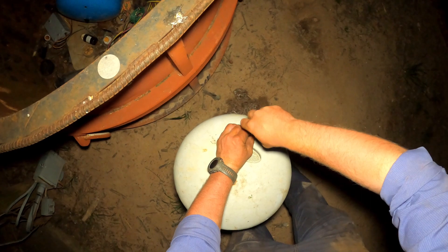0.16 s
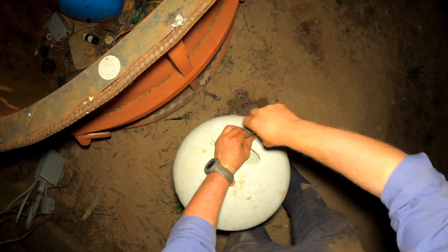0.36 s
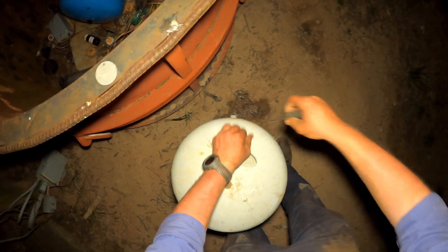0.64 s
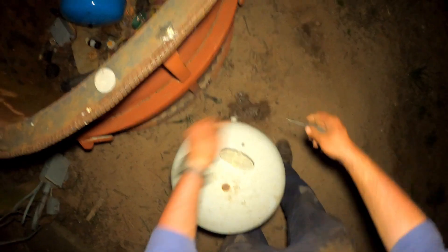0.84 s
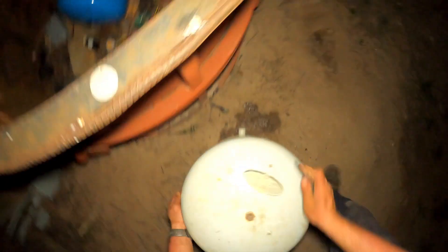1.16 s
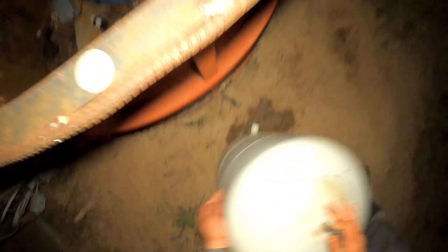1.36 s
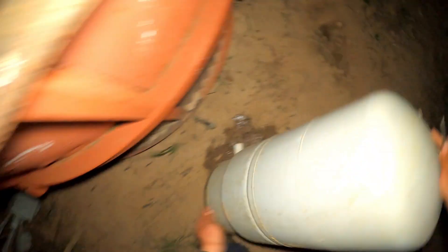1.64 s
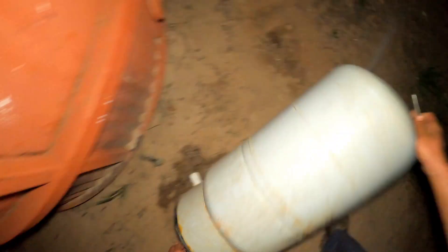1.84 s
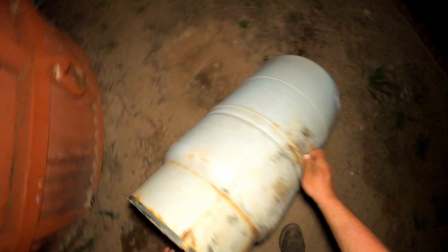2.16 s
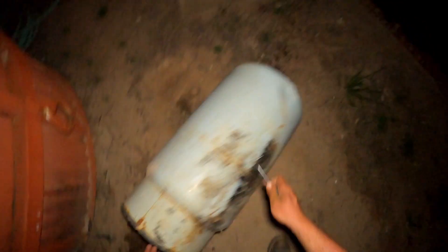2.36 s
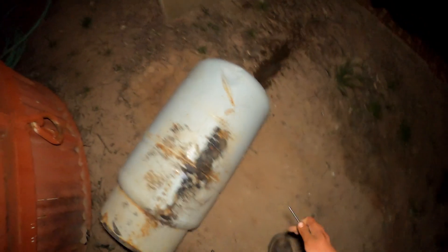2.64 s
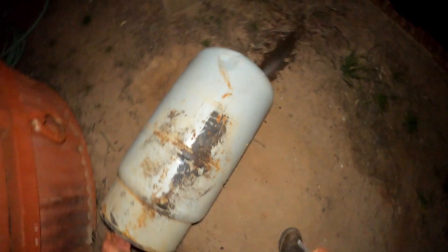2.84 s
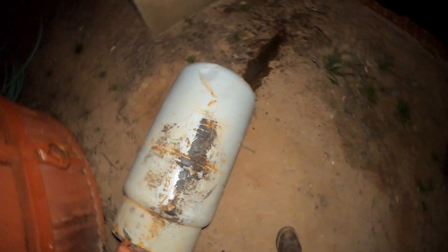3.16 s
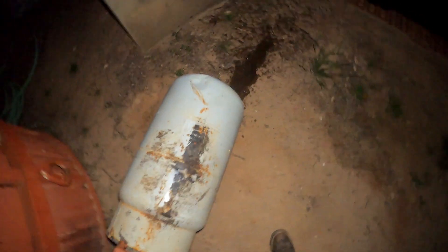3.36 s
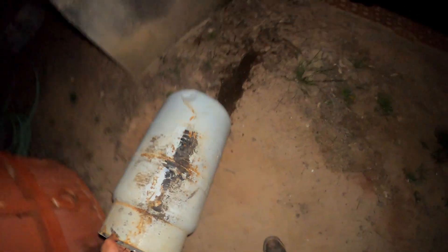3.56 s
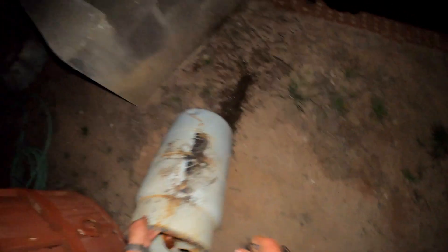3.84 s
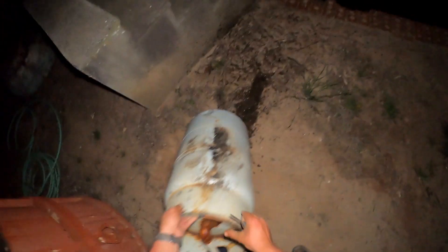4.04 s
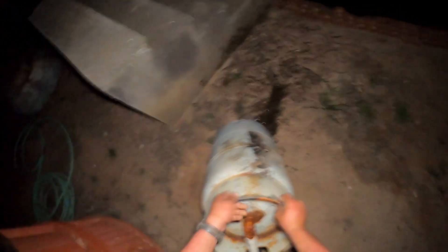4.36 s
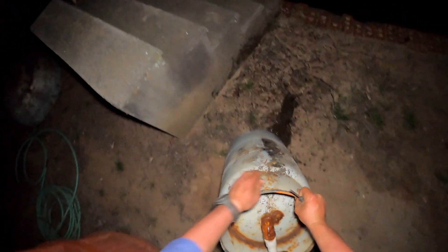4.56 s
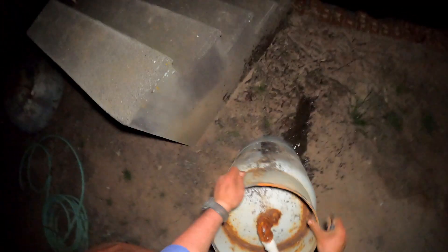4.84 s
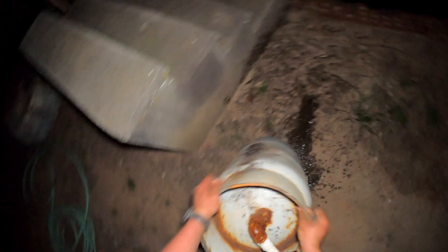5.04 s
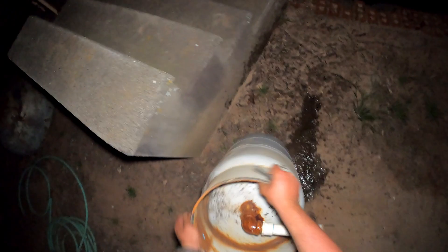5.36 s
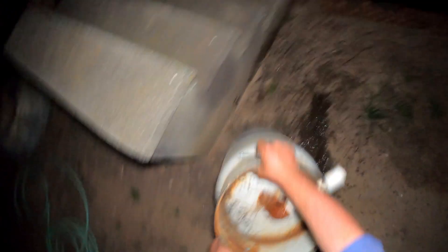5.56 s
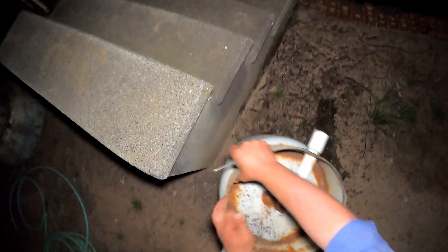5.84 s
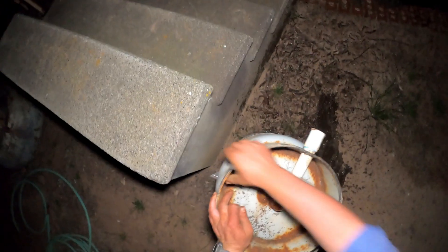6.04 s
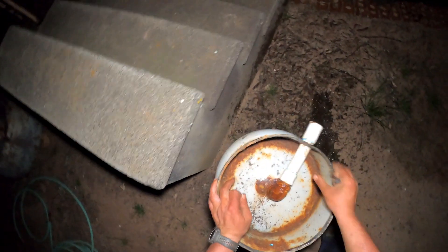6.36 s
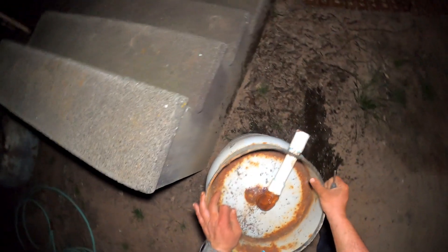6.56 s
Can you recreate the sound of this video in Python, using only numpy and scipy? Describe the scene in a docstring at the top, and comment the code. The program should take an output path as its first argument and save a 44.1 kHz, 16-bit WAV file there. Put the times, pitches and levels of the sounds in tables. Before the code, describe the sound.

Pressurised air hisses from a steel tank valve, jumps loud, then fades as the tank thuds down and sputtering water sprays onto dirt.

```python
"""Air hisses from the valve of a steel pressure tank outdoors, first past a hand, then freely.
The tank tips over with dull knocks, sprays water on dirt and is stood on its head; an engine hums far off.
Air and water are coloured noise, smooth or grainy. Gushes drive gliding resonances with grains and bubbles.
Knocks, clinks and glugs are short sines; grains ring the shell's modes; rasps and spits are resonant grains.
The hum is engine orders over low noise. Faint early reflections surround all but the hum."""
import sys
import numpy as np
from scipy import signal
from scipy.io import wavfile
from scipy.ndimage import uniform_filter1d

SR = 44100
rng = np.random.default_rng(int(sys.argv[2]) if len(sys.argv) > 2 else 0)


def int16_out(signal):
    """Quantize to a 16-bit WAV file."""
    q = np.round(np.clip(np.atleast_2d(signal).T, -1, 1) * 32767)
    wavfile.write(sys.argv[1], SR, q.astype(np.int16))


N = 295453
T = np.arange(N) / SR

# Levels in the tables are relative; each source applies its own trim.
# free air flow as the valve is worked: time_s, level_db
JET_FLOW = [(0, -35.5), (0.21, -36.5), (0.25, -29), (0.54, -29.5), (0.569, -13.5), (0.598, -20.5),
            (0.63, -16), (0.755, -19), (0.8, -16.5), (1.27, -18.5), (1.38, -26.5), (1.69, -27.5),
            (1.79, -31), (1.84, -45)]
# spectrum of the jet: freq_hz, level_db
JET_SPECTRUM = [(290, -62), (500, -5.5), (594, -30), (638, -15.5), (726, -12.5), (851, -13), (1220, -10.5),
                (1880, -2.5), (4440, 3.5), (6640, -1), (8480, -5), (9510, -4), (10500, -9), (15500, -40)]
HAND_OFF_S, HAND_SHADE_DB = 0.78, -2.5  # until it lets go, a hand shades the top octave
BLAST_S, BLAST_LENGTH_S, BLAST_DB = 2.69, 0.34, -28.5  # one more blast from the lying tank
BLAST_TOP_DB, BLAST_CLEARS_DB_PER_S = -6, 23  # its top starts dull, clears as water is blown out
ATTACK_S, RELEASE_S = 0.0073, 0.0073  # burst opening time, decay time constant
# hollow tones where the jet grazes a hand or the soil: start_s, end_s, start_hz, end_hz, width_hz, level_db
GRAZING_TONES = [(0, 0.564, 1370, 1502, 400, -38.5), (0, 0.097, 5360, 5100, 600, -38),
                 (0.1, 0.183, 5330, 5400, 260, -33.5), (0, 0.198, 4430, 4260, 700, -37),
                 (0, 0.221, 2500, 3150, 1300, -41), (0, 0.22, 7100, 7200, 300, -52),
                 (0, 0.195, 9830, 9700, 700, -44.5), (0.218, 0.31, 5390, 5220, 400, -32),
                 (0.222, 0.55, 4790, 3640, 620, -31.5), (0.28, 0.323, 9940, 9700, 900, -32.5),
                 (0.324, 0.452, 6600, 6030, 990, -30), (0.552, 0.594, 4910, 4380, 3500, -20),
                 (0.576, 0.755, 1800, 1243, 770, -23), (0.596, 0.682, 3140, 2384, 900, -22),
                 (0.669, 0.743, 2774, 2100, 900, -16.5), (.7, 0.768, 850, 468, 600, -33),
                 (2.688, 2.83, 2565, 2410, 1310, -28.5), (2.858, 3.02, 2557, 2656, 1300, -29.5),
                 (3.012, 3.06, 2500, 2827, 900, -25), (2.86, 3.059, 6030, 6500, 2200, -31.5),
                 (3.477, 3.822, 3990, 4220, 1300, -36), (4.052, 4.174, 1735, 1880, 330, -39),
                 (4.168, 4.278, 1876, 1940, 240, -37.5), (4.352, 4.45, 1860, 1770, 260, -40),
                 (4.43, 4.49, 1394, 1010, 300, -46), (4.532, 4.794, 4440, 4440, 650, -48),
                 (5.43, 5.55, 2396, 2810, 1010, -23), (5.565, 5.617, 3400, 3560, 350, -28),
                 (5.884, 6.001, 3120, 2815, 800, -24), (6.148, 6.287, 4650, 4550, 700, -29.5)]
GRAZE_FADE_SHARE = 0.17  # fade in and out, as a share of the tone's length
# water spraying on dirt: time_s, spray_db, splash_relative_db, mist_relative_db
SPRAY_FLOW = [(1.78, -30, -7, -10), (2.05, -34.5, -1.5, -5), (2.3, -40, -3, -3.5), (2.6, -34.5, -5, -3),
              (3.1, -35, -8, -0.5), (3.55, -34.5, -7.5, -2), (3.75, -35, -4, 0.5), (3.9, -36.5, -6.5, 0),
              (4.2, -33.5, -2.5, -3), (4.45, -37.5, 3.5, -4.5), (4.65, -35.5, -0.5, 0.5),
              (4.9, -38.5, 4.5, 0), (5.15, -32.5, -7, 1), (5.75, -33.5, -2.5, 0), (6.7, -36.5, 1.5, -0.5)]
# spectrum of the spray: freq_hz, level_db
SPRAY_SPECTRUM = [(290, -0.5), (500, 5), (553, -3), (803, 1.5), (982, 0.5), (1130, 0.5), (1560, -0.5),
                  (1960, -1.5), (2130, -2), (4570, -3), (5280, -10), (8240, -17), (10400, -17.5),
                  (11300, -25), (15500, -68)]
# scuffs and short rough surges of wet noise: start_s, length_s, level_db
ROUGH_SURGES = [(1.8, 0.018, -32), (1.925, 0.033, -34), (1.991, 0.039, -32), (2.153, 0.099, -32.5),
                (2.438, .022, -44), (2.52, 0.051, -36.5), (2.761, 0.072, -30), (3.009, 0.038, -31.5),
                (3.394, .045, -39), (4.907, 0.047, -36), (5.248, 0.063, -32), (6.036, 0.083, -22.5),
                (6.465, 0.12, -36.5)]
# gushes against the ground: start_s, length_s, crest_time_s, deep_roar_db, bright_rush_db
GROUND_GUSHES = [(3.314, 0.072, 3.338, -32.5, -22.5), (5.393, 0.26, 5.52, -22, -16.5),
                 (5.884, .365, 6.125, -19.5, -21)]
# resonances of the hollow between valve and mud, one list per gush: start_hz, end_hz, width_hz, level_db
GUSH_HOLLOWS = [
    [(750, 850, 750, 0), (2500, 2500, 770, -2), (3400, 3200, 1000, -1), (4200, 4250, 920, 0),
     (6600, 6600, 1100, -11)],
    [(333, 332, 290, 1.5), (474, 480, 240, 4), (600, 700, 190, 4.5), (950, 1080, 410, 2),
     (2200, 2300, 480, 4), (2456, 2650, 800, 0.5), (2500, 3600, 650, 1.5), (4240, 4400, 2500, -2.5),
     (9700, 12000, 2300, -24)],
    [(380, 380, 190, -11), (667, 667, 210, -2.5), (1050, 970, 390, 3), (1300, 1180, 310, -7.5),
     (2336, 2330, 1100, 2), (2950, 3100, 1400, -2), (3910, 4200, 830, 2.5), (4650, 4650, 740, 3.5),
     (6180, 6000, 2200, -3), (9700, 9800, 2600, -13.5)],
]
ROAR_ARCH_DB, RUSH_ARCH_DB = 7.5, 6.5  # crest of a gush over its ends
GUSH_RELEASE_S = 0.027  # slower than a dry burst
# grit crunches and water spits: start_s, level_db, centre_hz, width_hz
GRIT_SPITS = [(1.821, -23.5, 3380, 1800), (1.862, -23, 1600, 1500), (1.869, -19, 2600, 1500),
              (1.891, -25.5, 3930, 1400), (1.939, -25.5, 2000, 2000), (2.016, -32, 1500, 2000),
              (2.126, -30, 2400, 400), (2.16, -27, 1150, 1000), (2.254, -31, 2400, 500),
              (2.341, -32, 3000, 4500), (2.408, -28, 2860, 3180), (2.469, -25, 2960, 3480),
              (2.472, -29, 1170, 800), (2.531, -31, 2400, 3500), (2.617, -25, 2700, 1600),
              (3.256, -27, 3100, 1100), (3.322, -27, 3400, 2600), (3.378, -27, 3300, 3000),
              (4.925, -29, 1300, 1600), (5.275, -28, 1000, 700), (5.397, -20.5, 3560, 2600),
              (5.684, -20.5, 955, 500), (5.897, -20, 1110, 900), (6.003, -20, 980, 600),
              (6.061, -19, 1200, 1200), (6.587, -29, 3200, 1800)]
SPIT_DECAY_S = 0.0093
# tank bumps on the ground: time_s, level_db, contact_cutoff_hz, ring_length_share
GROUND_KNOCKS = [(1.837, -18.5, 700, 0.59), (1.845, -10, 270, 0.42), (1.862, -17, 2800, 0.75),
                 (1.868, -17, 2980, 0.83), (1.874, -15.5, 1400, 0.9), (1.885, -22, 1500, 0.9),
                 (1.892, -22, 1500, 0.59), (2.018, -25.5, 2500, 0.72), (2.346, -21, 700, .5),
                 (2.354, -13.5, 330, 0.66), (2.362, -16, 420, .45), (2.44, -24, 200, .8),
                 (2.474, -15, 520, 0.48), (2.478, -13, 260, 0.41)]
# free modes of the water-laden shell: mode_hz, level_db, t60_s
SHELL_MODES = [(114, -3.5, 0.053), (194, 0, 0.092), (256, -3.5, 0.11), (309, -6.5, 0.18), (388, -6, 0.12),
               (626, -1, 0.077), (760, -1, 0.15), (879, -2.5, 0.11), (1058, -6.5, 0.13), (1413, -7, 0.076),
               (2000, -3, 0.049), (2450, -2, 0.066), (2920, -7, .06)]
# short metallic clinks, perhaps tool or drops on steel: time_s, level_db, pitch_hz, upper_partial_relative_db
LIGHT_CLINKS = [(2.471, -21, 3900, -21), (2.562, -25, 3740, -11), (2.641, -20.5, 2920, -11),
                (3.148, -22.5, 2690, -15), (3.19, -25, 2950, -15), (3.259, -18, 2990, -15),
                (6.484, -25, 2880, -1), (6.55, -24, 2830, -6), (6.585, -22, 3100, -10)]
CLINK_T60_S, CLINK_UPPER_RATIO, CLINK_BOUNCE_S = 0.03, 1.4, 0.0033  # ring, upper/lower pitch, rebound delay
# water slopping inside the tank: start_s, length_s, start_hz, end_hz, level_db
WATER_GLUGS = [(2.369, 0.041, 275, 250, -33), (2.429, 0.019, 305, 385, -26), (2.449, 0.023, 365, 295, -27),
               (2.481, 0.022, 330, 400, -23)]
# hands and tool on the rim of the standing tank: start_s, length_s, centre_hz, width_hz, level_db
RIM_RASPS = [(6.456, .024, 1520, 1000, -28), (6.472, 0.018, 4360, 1300, -30.5),
             (6.5, 0.026, 1000, 1400, -31), (6.514, .028, 1210, 1000, -25), (6.519, 0.029, 3700, 2200, -33),
             (6.546, .06, 4650, 700, -33.5), (6.555, 0.043, 1300, 1300, -32.5)]
# jet reflected off the ground beside the tank: time_s, delay_ms, level_db
GROUND_REFLECTION = [(1.6, 1.2, -38), (1.85, 1.6, -12), (2.25, 2, -12), (2.7, 1.9, -17), (3.05, 1.96, -13),
                     (3.35, 2.2, -13), (3.8, 1.9, -19), (4.5, 1.47, -19), (5.55, 1.47, -21.5),
                     (5.9, 1.18, -21)]
# early reflections from ground, tank and steps: delay_s, level_db
EARLY_ECHOES = [(.0031, -31), (.0074, -24.5), (0.0116, -24), (0.0182, -18.5)]
# low background, which sinks under the loud hiss: time_s, engine_db, rumble_db
HUM_LEVELS = [(0, -38, -34.5), (0.5, -41.5, -36.5), (0.85, -58, -41.5), (1.5, -65, -45.5), (2.3, -52, -40),
              (2.8, -48, -36.5), (3.8, -40, -36), (5.2, -35.5, -34.5), (6.7, -41, -38.5)]
ENGINE_HZ = 28.34
# harmonics of the engine rate: order, level_db
ENGINE_HARMONICS = [(2, -23), (3, -10.5), (4, -6)]
# spectrum of the rumble: freq_hz, level_db
RUMBLE_SPECTRUM = [(22, -25), (36, -13), (68, -21), (90, 0), (135, -4), (180, 1), (230, -5), (290, -9),
                   (360, -10), (460, -7), (540, -12), (750, -23.5)]
DRONE_HZ, DRONE_WIDTH_HZ, DRONE_DB, DRONE_END_S = 181, 46, -35.5, 0.54  # low drone while the valve is held
CUTOFF_HZ = 15700


def from_db(db):
    """Amplitude ratio of a level in dB."""
    return 10 ** (np.asarray(db) / 20)


def rms_one(x):
    """Scale to RMS 1."""
    return x / np.sqrt(np.mean(x ** 2) + 1e-20)


def in_time(rows):
    """Each column of a curve, interpolated at every sample."""
    time_s, *columns = np.transpose(rows)
    return [np.interp(T, time_s, column) for column in columns]


def gate(start_s, end_s, edge_s=0.004):
    """1 between two times, with linear edges centred on them."""
    opening = np.clip((T - start_s) / edge_s + .5, 0, 1)
    closing = np.clip((end_s - T) / edge_s + .5, 0, 1)
    return opening * closing


def burst(start_s, length_s, release_s=RELEASE_S):
    """Linear attack, hold, exponential release."""
    attack = np.clip((T - start_s) / ATTACK_S, 0, 1)
    return attack * np.exp(-np.maximum(T - start_s - length_s, 0) / release_s)


def drift(rate_hz):
    """Low-passed noise of RMS 1, computed at every 40th sample."""
    r = np.exp(-80 * np.pi * rate_hz / SR)
    noise = rng.standard_normal(N // 40 + 2002)
    slow = signal.lfilter([1], [1, -2 * r, r * r], noise)[2000:]  # drop the settling
    return np.interp(np.arange(N) / 40, np.arange(len(slow)), rms_one(slow))


def low_pass(x, order, cutoff_hz):
    """Butterworth low-pass."""
    return signal.sosfilt(signal.butter(order, cutoff_hz, fs=SR, output="sos"), x)


def band(x, low_hz, high_hz):
    """Butterworth band-pass."""
    edges_hz = [np.clip(low_hz, 10, SR * .4), np.clip(high_hz, 12, SR * .45)]
    return signal.sosfilt(signal.butter(2, edges_hz, "band", fs=SR, output="sos"), x)


def resonance(x, hz, width_hz):
    """Two-pole resonance, gain about 1 on top."""
    r = np.exp(-np.pi * width_hz / SR)
    zeros = np.array([1, 0, -1]) * (1 - r * r) / 2
    return signal.lfilter(zeros, [1, -2 * r * np.cos(2 * np.pi * hz / SR), r * r], x)


def double_resonance(x, hz, width_hz):
    """The same resonance twice, for steeper skirts."""
    return resonance(resonance(x, hz, width_hz), hz, width_hz)


def droplets(per_s, spread_db, share):
    """Impacts of uneven size mixed by power share into smooth turbulence."""
    sizes = from_db(spread_db * np.minimum(rng.exponential(1, N), 4)) * rng.choice([-1, 1], N)
    hits = rms_one(sizes * (rng.random(N) < per_s / SR))
    share = np.clip(share, 0, 1)
    return np.sqrt(share) * hits + np.sqrt(1 - share) * rng.standard_normal(N)


def coloured_bands(sources, spectrum, flicker_db, flicker_hz, count):
    """Centres and flickering bands of a spectrum; neighbours are fed by unrelated sources."""
    hz, db = np.transpose(spectrum)
    edges_hz = np.geomspace(hz[0], hz[-1], count + 1)
    centres_hz = np.sqrt(edges_hz[:-1] * edges_hz[1:])
    gains_db = np.interp(np.log(centres_hz), np.log(hz), db)
    bands = []
    for k in range(count):
        gain = from_db(gains_db[k] + flicker_db * drift(flicker_hz))
        bands.append(band(sources[k % 2], edges_hz[k], edges_hz[k + 1]) * gain)
    return centres_hz, np.array(bands)


def air_jet(level_db=1.5, top_db=-7.0, wet_flutter_db=1.2):
    """Smooth turbulent hiss, duller behind the hand; water makes the lying tank's blast sputter."""
    noise = rng.standard_normal((2, N))
    hz, bands = coloured_bands(noise, JET_SPECTRUM, flicker_db=1.0, flicker_hz=9.8, count=22)
    high = hz > 8500
    body = from_db(level_db) * rms_one(bands[~high].sum(0))
    top = from_db(top_db) * rms_one(bands[high].sum(0))
    flow_db, = in_time(JET_FLOW)
    shade_db = HAND_SHADE_DB * gate(-1, HAND_OFF_S, edge_s=0.027)
    upright = gate(-1, JET_FLOW[-1][0]) * from_db(flow_db) * (body + from_db(shade_db) * top)
    clearing_db = BLAST_CLEARS_DB_PER_S * np.clip(T - BLAST_S, 0, BLAST_LENGTH_S)
    lying = burst(BLAST_S, BLAST_LENGTH_S) * from_db(BLAST_DB + wet_flutter_db * drift(200))
    return upright + lying * (body + from_db(BLAST_TOP_DB + clearing_db) * top)


def grazing_tones(flutter_db=1.0, wander=.015):
    """The gap beside the jet picks a band of turbulence, which glides unsteadily as the gap changes."""
    out = 0
    unsteady = 1 + wander * drift(20)
    for start_s, end_s, from_hz, to_hz, width_hz, db in GRAZING_TONES:
        glide_hz = np.interp(T, [start_s, end_s], [from_hz, to_hz]) * unsteady
        phase = 2 * np.pi * np.cumsum(glide_hz) / SR
        swell = low_pass(rng.standard_normal((2, N)), 2, width_hz / 2)
        tone = rms_one(swell[0] * np.cos(phase) + swell[1] * np.sin(phase))
        fade = gate(start_s, end_s, edge_s=GRAZE_FADE_SHARE * (end_s - start_s))
        out = out + from_db(db) * fade * tone
    return out * from_db(flutter_db * drift(54))


def rough_surges():
    """Strength of the scuffs and short rough surges."""
    return sum(from_db(db) * burst(start_s, length_s) for start_s, length_s, db in ROUGH_SURGES)


def water_spray(splash_db=0.0, patter_db=0.0, mist_db=-4.0, sputter_db=1.0,
                rough_low_db=-1.5, rough_top_db=-11, onset_s=0.22):
    """Big drops splash low, small ones patter, the finest hiss as mist; rough surges add coarse grains."""
    drops = [droplets(per_s=3500, spread_db=2.0, share=0.45) for _ in range(2)]
    hz, bands = coloured_bands(drops, SPRAY_SPECTRUM, flicker_db=2.25, flicker_hz=16.5, count=24)
    size = np.digitize(hz, [1900, 5200])
    splash, patter, mist = [rms_one(bands[size == k].sum(0)) for k in range(3)]
    db, coarse_db, fine_db = in_time(SPRAY_FLOW)
    flow = gate(SPRAY_FLOW[0][0], np.inf, edge_s=onset_s) * from_db(db)
    rough = rough_surges()
    # spray and rough surges add in power
    splash_gain = np.hypot(flow * from_db(coarse_db + splash_db), rough * from_db(rough_low_db))
    patter_gain = np.hypot(flow * from_db(patter_db), rough)
    mist_gain = np.hypot(flow * from_db(fine_db + mist_db), rough * from_db(rough_top_db))
    water = splash_gain * splash + patter_gain * patter + mist_gain * mist
    return from_db(sputter_db * drift(23)) * water


def bubbles(count=4000, cycles=22, rise=.15, spread_db=1.0):
    """Bubbles of all sizes pinch off at random; each rings some cycles and rises in pitch."""
    when, small, luck = rng.random((count, 3)).T[:, :, None]
    hz = 300 + 4700 * small ** 2
    age_s = T[:SR // 30]
    life = np.minimum(age_s * hz / cycles, 2)
    size = np.sqrt(hz) * from_db(-spread_db * np.log(np.maximum(luck, np.exp(-3))))
    phase = 2 * np.pi * cycles * life * (1 + rise * life / 2)
    rings = size * np.sin(phase) * np.exp(-np.log(1000) * life)
    at = (when * N).astype(int) + np.arange(len(age_s))
    return rms_one(np.bincount(at.ravel(), rings.ravel(), N)[:N])


def gushes(roar_db=0.0, rush_db=-1.5, gurgle_db=-10.5, flutter_db=0.5, shift_db=1.5,
           wander=.02, lift=.04, roar_lag_s=0.01):
    """Air and water bubble through mud; the hollow's resonances glide as it is washed out."""
    out = np.zeros(N)
    gurgle = from_db(gurgle_db) * bubbles()
    flows = [droplets(per_s=1800, spread_db=1.0, share=0.61) + gurgle for _ in range(3)]
    surges = [from_db(shift_db * drift(28)) for _ in range(4)]
    unsteady = 1 + wander * drift(14.05)
    for (start_s, length_s, crest_s, deep_db, bright_db), hollow in zip(GROUND_GUSHES, GUSH_HOLLOWS):
        end_s = start_s + length_s
        here = (T > start_s) & (T < end_s + .15)
        ebb = np.interp(T[here], [start_s, crest_s, end_s], [-1, 0, 1]) ** 2  # 0 at the crest
        deep, bright = np.zeros((2, len(ebb)))
        for k, (hz, to_hz, width_hz, db) in enumerate(hollow):
            flow = (flows[k % len(flows)] * surges[k % len(surges)])[T > start_s]
            ringing = double_resonance(flow, hz, width_hz)
            # reading the ringing at a changing speed bends its pitch
            glide = np.interp(T[here], [start_s, end_s], [1, to_hz / hz])
            speed = glide * (unsteady[here] + lift * (.2 - ebb))
            part = deep if hz < 1600 else bright
            part += from_db(db) * np.interp(np.cumsum(speed), np.arange(len(ringing)), ringing)
        roar = burst(start_s + roar_lag_s, length_s - roar_lag_s, GUSH_RELEASE_S)[here]
        roar = roar * from_db(deep_db + roar_db - ROAR_ARCH_DB * ebb) * rms_one(deep)
        rush = burst(start_s, length_s, GUSH_RELEASE_S)[here]
        rush = rush * from_db(bright_db + rush_db - RUSH_ARCH_DB * ebb) * rms_one(bright)
        out[here] += roar + rush
    return out * from_db(flutter_db * drift(77))


def spits(level_db=0.0):
    """Brief clusters of grains that swell within 1 ms and die away."""
    grains = droplets(per_s=4000, spread_db=1.5, share=0.4)
    out = np.zeros(N)
    age_s = T[:SR // 10]
    envelope = np.minimum(age_s / .001, 1) * np.exp(-age_s / SPIT_DECAY_S)
    for start_s, db, hz, width_hz in GRIT_SPITS:
        at = round(start_s * SR)
        here = slice(at, at + len(age_s))
        out[here] += from_db(db + level_db) * envelope * rms_one(double_resonance(grains[here], hz, width_hz))
    return out


def tank_knocks(level_db=-7.5, scatter_db=4.5):
    """Each bump rings the shell; soft soil rounds the blow, spares the higher modes and damps the ring."""
    out = np.zeros(N)
    age_s = T[:SR // 3]
    hz, mode_db, t60_s = np.transpose(SHELL_MODES)[:, :, None]
    signs = np.resize([1, -1], hz.shape)
    for time_s, db, soft_hz, ring_share in GROUND_KNOCKS:
        strength = from_db(db + level_db + mode_db + scatter_db * rng.standard_normal(hz.shape))
        decay = np.exp(-np.log(1000) * age_s / (t60_s * ring_share))
        modes = signs * strength * np.sin(2 * np.pi * hz * age_s) * decay
        at = round(time_s * SR)
        out[at:at + len(age_s)] += low_pass(modes.sum(0), 4, soft_hz)
    return band(out, 57, 8000)


def tank_rattle(level_db=-9.0, grit_db=-8.5, low_hz=600):
    """During the rough surges, single stones tick against the tank and set its modes ringing."""
    stones = droplets(per_s=160, spread_db=3.5, share=0.99)
    grit = rms_one(band(stones, 1600, 6500))
    knocking = rms_one(band(stones, low_hz, 5700))
    rough = rough_surges()
    ring = 0
    for k, (hz, db, t60_s) in enumerate(SHELL_MODES):
        width_hz = np.log(1000) / (np.pi * t60_s)
        mode = resonance(knocking * rough + 1e-18, hz, width_hz)
        ring = ring + (-1) ** k * from_db(db) * np.sqrt(1000 / width_hz) * mode
    return from_db(level_db) * ring + from_db(grit_db) * grit * rough


def clinks(level_db=-1.0, detune=0.031):
    """A light tap strikes and rebounds, ringing two short partials at a slightly different pitch each time."""
    out = np.zeros(N)
    age_s = T[:SR // 10]
    decay = np.exp(-np.log(1000) * age_s / CLINK_T60_S)
    for time_s, db, hz, upper_db in LIGHT_CLINKS:
        for touch in range(2):
            phase = 2 * np.pi * hz * (1 + detune * rng.uniform(-1.13, 1)) * age_s
            ring = (np.sin(phase) + from_db(upper_db) * np.sin(CLINK_UPPER_RATIO * phase)) * decay
            at = round((time_s + touch * CLINK_BOUNCE_S) * SR)
            out[at:at + len(age_s)] += from_db(db + level_db) * ring
    return out


def glugs(level_db=0.0):
    """A pocket of air trapped by slopping water rings for a few cycles and bends in pitch."""
    out = np.zeros(N)
    for start_s, length_s, from_hz, to_hz, db in WATER_GLUGS:
        here = (T > start_s) & (T < start_s + length_s)
        progress = (T[here] - start_s) / length_s
        phase = 2 * np.pi * np.cumsum(from_hz + (to_hz - from_hz) * progress) / SR
        out[here] += from_db(db + level_db) * np.sin(np.pi * progress) * np.sin(phase)
    return out


def rasps(level_db=0.0):
    """Short strokes of stick and slip on rusty steel, each with its own pitch."""
    slips = droplets(per_s=1000, spread_db=1.0, share=0.53)
    out = 0
    for start_s, length_s, hz, width_hz, db in RIM_RASPS:
        stroke = rms_one(double_resonance(slips, hz, width_hz))
        out = out + from_db(db + level_db) * burst(start_s, length_s) * stroke
    return out


def hum(rumble_db=1.5, waver_db=4.0, wander=0.025, throb=0.12):
    """A far engine: wavering orders over a rumble that throbs at the engine rate, plus an early drone."""
    engine_db, noise_db = in_time(HUM_LEVELS)
    phase = 2 * np.pi * np.cumsum(ENGINE_HZ * (1 + wander * drift(2.8))) / SR
    tones = 0
    for order, db in ENGINE_HARMONICS:
        gain = from_db(db + waver_db * drift(18.0)) * np.sqrt(2)
        tones = tones + gain * np.sin(round(order) * phase + rng.uniform(0, 2 * np.pi))
    noise = rng.standard_normal((2, N))
    _, bands = coloured_bands(noise, RUMBLE_SPECTRUM, flicker_db=1.0, flicker_hz=8.2, count=14)
    rumble = rms_one(bands.sum(0) * (1 + throb * np.sin(phase)))
    half_hz = DRONE_WIDTH_HZ / 2
    drone = rms_one(band(rng.standard_normal(N), DRONE_HZ - half_hz, DRONE_HZ + half_hz))
    held = gate(-1, DRONE_END_S, edge_s=0.3)
    return from_db(engine_db) * tones + from_db(noise_db + rumble_db) * rumble + from_db(DRONE_DB) * held * drone


def off_the_ground(x):
    """One close reflection combs the hiss; the comb slides as the tank is moved."""
    delay_ms, db = in_time(GROUND_REFLECTION)
    return x + from_db(db) * np.interp(T - delay_ms / 1000, T, x, left=0)


def yard(x):
    """A few faint early reflections."""
    return x + sum(from_db(db) * np.interp(T - delay_s, T, x, left=0) for delay_s, db in EARLY_ECHOES)


def scene():
    """All sources in the middle, plus faint decorrelated noise above 11 kHz, following the treble."""
    jet = off_the_ground(air_jet() + grazing_tones() + water_spray() + gushes() + spits())
    middle = yard(jet + clinks() + tank_knocks() + glugs() + tank_rattle() + rasps()) + hum()
    treble = np.sqrt(np.abs(uniform_filter1d(band(middle, 10500, 13000) ** 2, size=900)))
    high_pass = signal.ellip(8, .5, 70, 11200, "high", fs=SR, output="sos")
    side_noise = signal.sosfilt(high_pass, rng.standard_normal(N))
    side = (from_db(-7.0) * treble + from_db(-95.0)) * rms_one(band(side_noise, 11400, 13800))
    return middle + side * np.array([[1], [-1]])  # opposite sign left and right


def record(dry):
    """The microphone port has a dip under a small peak near 9 kHz; loud peaks are rounded, the top is cut."""
    coloured = dry - .5 * resonance(dry, 8640, 940) + 0.58 * resonance(dry, 9340, 1000)
    rounded = 1.5 * np.tanh(coloured / 1.5)
    return signal.sosfilt(signal.ellip(10, .1, 80, CUTOFF_HZ, fs=SR, output="sos"), rounded)


dry = scene()
out = record(dry)
int16_out(out)
```